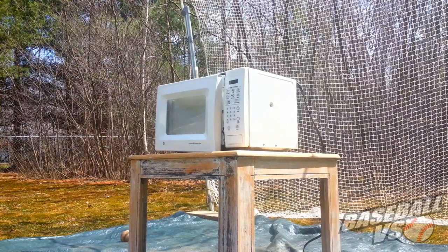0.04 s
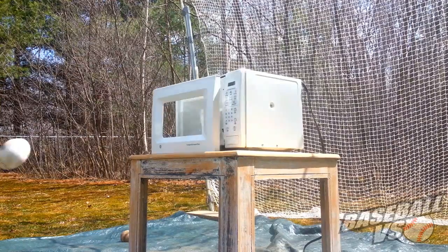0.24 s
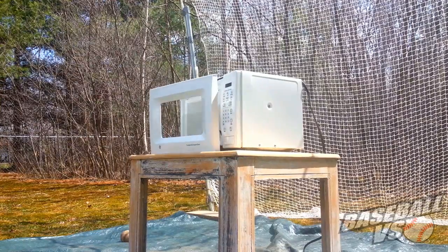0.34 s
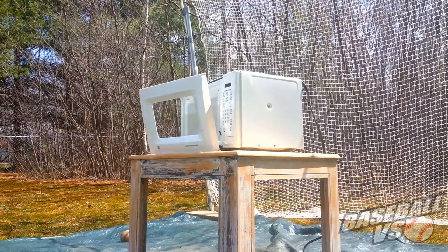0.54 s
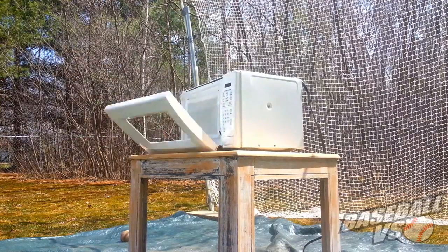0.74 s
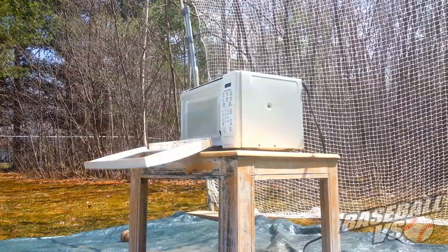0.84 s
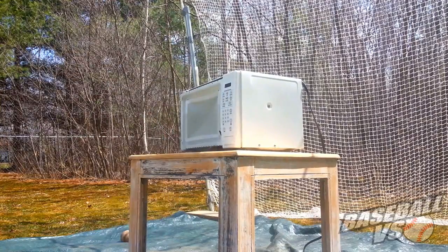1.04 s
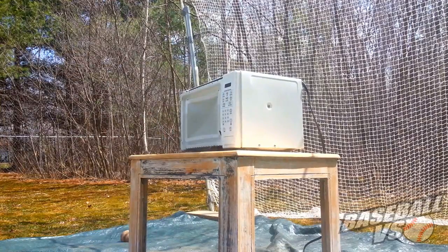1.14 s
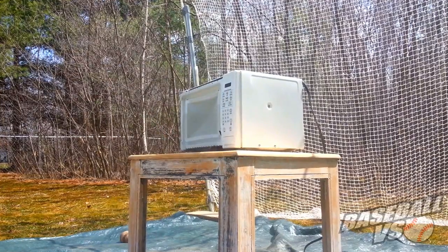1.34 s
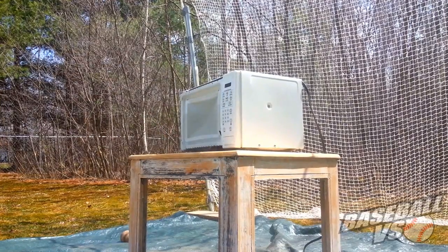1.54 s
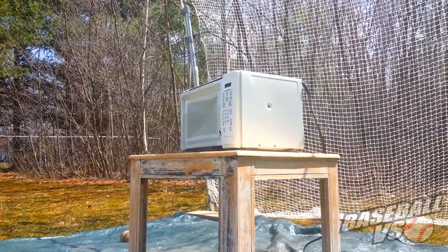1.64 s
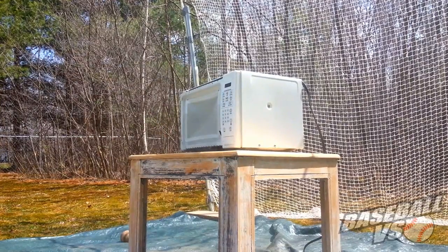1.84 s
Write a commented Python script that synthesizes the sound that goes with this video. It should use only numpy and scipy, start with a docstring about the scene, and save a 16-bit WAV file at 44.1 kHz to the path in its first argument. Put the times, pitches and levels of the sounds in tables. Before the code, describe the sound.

Outdoors, a loud bang rings out as a baseball hits a microwave in front of the microphone, slightly distorting and echoing off trees. About a second later the detached door scrapes, lands with a clatter and bounces.

```python
"""Outdoors among trees, the microphone facing a microwave on a table; soft air and distant chirring.
A fast baseball rushes in and smashes into it, and the bang overloads the microphone. The steel
case rings and the surrounding trees return a long echo. The door tears loose, knocks and scrapes
past the table, then crashes on the ground and bounces with its loose parts rattling."""
import sys
import numpy as np
from scipy import signal
from scipy.fft import rfft, irfft
from scipy.io import wavfile

SR = 44100
rng = np.random.default_rng(int(sys.argv[2]) if len(sys.argv) > 2 else 0)


def to_wav(sig):
    """Store sig (one row per channel, or 1-D mono) as 16-bit WAV at the path in sys.argv[1].

    Samples outside -1..1 are clipped; the rate is SR.
    """
    pcm = np.clip(np.atleast_2d(sig), -1, 1) * 32767
    pcm = np.round(pcm).astype(np.int16)
    wavfile.write(sys.argv[1], SR, pcm.T)  # frames by channels


N = 83790
IMPACT_S = .2437

# blows on the steel case: start_s, crack_db, tilt_db_per_octave, crack_t60_s, ring_db
CASE_BLOWS = [(.2437, 17, -2, 0.017, -13.5), (.2492, 9.5, 0.5, 0.064, -7.5), (.272, 6.5, -3.5, .06, -27.5),
              (.289, -20.5, 2, 0.056, -34), (.371, -9.5, -4, .05, -24.5), (.411, -14.5, -3.5, 0.11, -31)]
# colour of the case's crack and of its ring: frequency_hz, level_db
CASE_CRACK_SPECTRUM = [(40, -21), (90, -8.5), (160, -5), (400, 0), (1000, 1), (2200, -8.5), (5000, -6),
                       (9000, -13.5), (15000, -21)]
CASE_RING_SPECTRUM = [(40, -15), (150, -20), (350, -1), (900, 0.5), (1500, 3.5), (2500, -6), (4500, -14.5),
                      (8000, -12), (15000, -33)]
# ring time of the case: frequency_hz, t60_s
CASE_DECAY = [(60, 0.26), (300, 0.63), (1000, 0.4), (4000, 0.28), (14000, 0.2)]
# sheet steel modes: pitch_hz, level_db, t60_s
STEEL_MODES = [(290.2, -2, 1), (335, -16, .5), (478, -5.5, 0.73), (592, 11, 0.5), (614, -25, .6),
               (796.3, 7.5, 0.62), (873, 5.5, 0.65), (1039, -2, 0.96), (1100, 3, .3), (1155, -2, 0.27),
               (1417, -8, 1), (1540, -27, .45), (1830, -42, .66), (2230, -23, 0.59)]

# blows of the loose door: start_s, crack_db, tilt_db_per_octave, crack_t60_s, ring_db, rim_db
DOOR_BLOWS = [(.639, -43, -2, 0.06, -39.5, -52), (.9227, -16, 12, 0.012, -35.5, -54),
              (0.9634, -21, -1.5, 0.048, -30.5, -29), (1.2004, 3.5, 3, 0.075, -7.5, -2.5),
              (1.218, -8, 3.5, 0.088, -17.5, -26), (1.23, -14, 2.5, .05, -31, -41),
              (1.258, -22, 11, 0.2, -25, -25), (1.2949, -5, -1, 0.048, -13.5, -27),
              (1.3072, -12.5, 0, 0.052, -18, -15), (1.323, -12.5, -1.5, 0.012, -18, -28),
              (1.334, -23, -2, 0.076, -26, -21), (1.345, -14.5, -3, 0.034, -22, -20),
              (1.422, -24, 1, 0.038, -40, -38), (1.4358, -12, 0, 0.019, -23, -14.5),
              (1.469, -26, -4, 0.025, -37, -39), (1.481, -20, -3.5, 0.014, -36, -30),
              (1.6051, -13, -1, 0.048, -32.5, -15.5), (1.6135, -8, 0.5, .018, -25, -7.5),
              (1.641, -23, -1.5, 0.028, -48, -25.5)]
# colour of the door's crack and of its ring: frequency_hz, level_db
DOOR_CRACK_SPECTRUM = [(50, -31), (120, -25.5), (230, -8.5), (450, 0), (780, -0.5), (1300, 0), (1800, 0),
                       (2500, -7.5), (3300, -3), (4000, -6.5), (5200, -5.5), (7200, -17), (15000, -35)]
DOOR_RING_SPECTRUM = [(50, -48), (160, -27), (260, -8), (450, -4.5), (720, 3), (1250, -2.5), (1800, -6),
                      (2500, -11.5), (5000, -18), (9000, -34.5), (15000, -36)]
# ring time of the door: frequency_hz, t60_s
DOOR_DECAY = [(100, 0.29), (400, .26), (1000, 0.17), (4000, 0.25), (14000, 0.27)]
# modes of the plastic frame and window, and of the stiff rim: pitch_hz, level_db, t60_s
DOOR_MODES = [(256.1, -12, 0.78), (435.5, 5, 0.28), (496, 7, 0.22), (566, -17, .25), (670.6, 7, 0.24),
              (667, -7, 0.35), (767, 10, 0.19), (818, 5, 0.24), (1058, -3, .15), (1140, -15, 0.097),
              (1177, 2, 0.21), (1278, -2.5, 0.23), (1456, -1.5, 0.18), (1797, 1, 0.12)]
RIM_MODES = [(296.5, -19, 0.098), (779, -5, 0.038), (1755, -0.5, 0.04), (1865, -7, 0.037),
             (3250, -10.5, 0.022), (4763, -0.5, 0.021), (5047, 0.5, 0.019), (5616, -4.5, 0.015)]

# dull knocks and pushes on door, table and ground: start_s, level_db, pitch_hz, t60_s
THUMPS = [(0.2456, 11, 338, 0.026), (.246, -12, 45.6, 0.11), (0.263, -10, 151, 0.082),
          (.411, -9, 340, 0.078), (.425, -6.5, 240, .05), (0.9234, -33.5, 390, 0.1),
          (.966, -37.5, 242, 0.33), (1.202, -19, 60.3, 0.052), (1.296, -14.5, 71, 0.036),
          (1.694, -28, 110, 0.036), (1.7175, -19, 146, 0.03)]
# colour of a loose part's click and of the door's scrape: frequency_hz, level_db
CLICK_SPECTRUM = [(200, -33), (700, -13), (1200, 14), (2400, -14), (3500, -3), (5500, -3.5), (8000, -10.5),
                  (15000, -38)]
SCRAPE_SPECTRUM = [(100, -20), (600, -3.5), (1500, -10), (2300, -13.5), (4100, -5.5), (6500, -6.5),
                   (9000, -10.5), (14500, -15.5)]
# loudness of the scrape: time_s, level_db
SCRAPE_ENVELOPE = [(1.124, -79), (1.129, -31), (1.146, -25.5), (1.155, -30), (1.162, -35.5), (1.174, -46),
                   (1.186, -38.5), (1.2, -34), (1.21, -66)]
# air rushing round the ball: frequency_hz, level_db
RUSH_SPECTRUM = [(25, -5.5), (70, 4), (200, -12), (500, -11), (1500, -16.5), (5000, -14), (14000, -20)]
# colour of the echo from the trees: frequency_hz, level_db
ECHO_SPECTRUM = [(40, -58), (85, -30.5), (130, -1), (230, 0), (450, -0.5), (900, -7.5), (1600, -12),
                 (2600, -15), (4200, -14), (7000, -22), (14000, -36)]
# decay of that echo: frequency_hz, t60_s
ECHO_DECAY = [(60, 1.27), (170, 1.32), (350, 1.03), (900, 0.82), (2500, 1.1), (4500, 0.78), (8000, 0.64),
              (14000, 0.33)]
# open air: frequency_hz, level_db
AIR_SPECTRUM = [(20, -37), (60, -1), (110, -1.5), (200, -1.5), (300, -5.5), (700, -10.5), (1500, -13),
                (2800, -19), (5000, -21), (9000, -24.5), (14500, -23.5)]


def steel_case():
    """The ball hits, the door bursts and the box jumps on the table: each blow cracks and rings."""
    out = np.zeros(N)
    for start_s, crack_db, tilt_db, t60_s, ring_db in CASE_BLOWS:
        ring = dense_ring(CASE_RING_SPECTRUM, CASE_DECAY, size=32768, rise_s=0.0021)
        ring += amp(-4) * struck_modes(STEEL_MODES, size=32768)
        add(out, start_s, amp(crack_db) * crack(CASE_CRACK_SPECTRUM, tilt_db, t60_s, size=8192))
        add(out, start_s, amp(ring_db) * ring)
    return out


def loose_door():
    """The door knocks on the table, lands and bounces: a crack, a clack of its rim, a hollow ring."""
    out = np.zeros(N)
    for start_s, crack_db, tilt_db, t60_s, ring_db, rim_db in DOOR_BLOWS:
        ring = dense_ring(DOOR_RING_SPECTRUM, DOOR_DECAY, size=16384, rise_s=0.0045)
        ring += amp(-0.5) * struck_modes(DOOR_MODES, size=16384)
        add(out, start_s, amp(crack_db) * crack(DOOR_CRACK_SPECTRUM, tilt_db, t60_s, size=8192))
        add(out, start_s, amp(rim_db) * struck_modes(RIM_MODES, size=8192))
        add(out, start_s, amp(ring_db) * ring)
    return out


def thumps():
    """Door, table and ground answer knocks and pushes with heavily damped low swings."""
    out = np.zeros(N)
    t = np.arange(SR // 2) / SR
    for start_s, level_db, pitch_hz, t60_s in THUMPS:
        swing = -np.sin(2 * np.pi * pitch_hz * t) * fade(t, t60_s)
        attack = np.minimum(2 * t * pitch_hz, 1)  # half a cycle
        add(out, start_s, amp(level_db) * swing * attack)
    return out


def rattle():
    """After the landing, loose parts chatter in a dying shower of small clicks."""
    start_s, end_s = 1.235, 1.49
    parts, clicks_per_s = 8, 650  # the rate of all parts together
    size = round((end_s - start_s) * SR)
    out, clicks = np.zeros(N), np.zeros(size)
    for _ in range(parts):
        hits = rng.random(N)[:size] < clicks_per_s / parts / SR
        hit_db = -0.5 * np.minimum(rng.exponential(1, N), 4)[:size]
        click = crack(CLICK_SPECTRUM, tilt_db=0, t60_s=0.0062, size=1024)
        clicks += signal.fftconvolve(hits * amp(hit_db), click)[:size]
    add(out, start_s, amp(-15.5) * unit_rms(clicks) * fade(np.arange(size) / SR, t60_s=0.53))
    return out


def scrape():
    """The door slides past an edge just before landing: brief, bright friction noise."""
    t = np.arange(N) / SR
    level_db = np.interp(t, *np.transpose(SCRAPE_ENVELOPE), left=-120, right=-120)
    return noise(SCRAPE_SPECTRUM, N) * amp(level_db)


def ball_rush():
    """Air rushes louder as the ball closes in, and stops at the impact."""
    arrival_db, rise_db_per_s = -44.5, 114
    t = np.arange(N) / SR
    level_db = arrival_db - rise_db_per_s * abs(IMPACT_S - t)
    return noise(RUSH_SPECTRUM, N) * amp(level_db) * (t < IMPACT_S)


def tree_echo():
    """The bang comes back from many trunks as a wash of noise, the bass lingering longest."""
    round_trip_s = .035
    out = np.zeros(N)
    echo = dense_ring(ECHO_SPECTRUM, ECHO_DECAY, size=65536, rise_s=0.053)
    add(out, IMPACT_S + round_trip_s, amp(-11.5) * echo)
    return out


def outdoor_air():
    """Soft open air, with a thin, high band of chirring in the distance."""
    chirr_hz, width_hz = 3580, 440
    hz = np.fft.rfftfreq(N, 1 / SR)
    band = np.exp(-.5 * ((hz - chirr_hz) / width_hz) ** 2)
    chirr = irfft(rfft(rng.standard_normal(N)) * band, N)
    return amp(-51) * noise(AIR_SPECTRUM, N) + amp(-58.5) * unit_rms(chirr)


def crack(spectrum, tilt_db, t60_s, size):
    """A short burst of contact noise, coloured by the struck object."""
    burst = rng.standard_normal(size) * fade(np.arange(size) / SR, t60_s)
    return colour(burst, spectrum, tilt_db)


def struck_modes(modes, size):
    """An object's main modes: decaying sines, struck in a new mixture each time."""
    t = np.arange(size) / SR
    hz, level_db, t60_s = np.transpose(modes)[:, :, None]
    phase, boost = rng.random((len(hz), 2)).T[:, :, None]
    weight = amp(level_db) / np.linalg.norm(amp(level_db)) * (1 + boost)
    attack = np.minimum(t * hz / 2, 1)  # two cycles
    return (weight * np.sin(2 * np.pi * (hz * t + phase)) * fade(t, t60_s) * attack).sum(0)


def dense_ring(spectrum, decay, size, rise_s):
    """Countless close modes: noise that swells, then dies at its own speed in each band."""
    t, hz = np.arange(size) / SR, np.fft.rfftfreq(size, 1 / SR)
    centres_hz = np.geomspace(60, 14000, 10)
    noise_bins = rfft(noise(spectrum, size))
    ring = np.zeros(size)
    for centre_hz, selector in zip(centres_hz, np.eye(len(centres_hz))):
        band = value_at(np.c_[centres_hz, selector], hz)  # slopes to zero at the neighbouring centres
        ring += irfft(noise_bins * band, size) * fade(t, value_at(decay, centre_hz))
    return np.minimum(t / rise_s, 1) * ring


def colour(x, spectrum, tilt_db):
    """Minimum-phase filter of unit energy: a spectrum, tilted by tilt_db per octave above 300 Hz."""
    size = 2048
    hz = abs(np.fft.fftfreq(size, 1 / SR))
    log_gain = np.log(amp(value_at(spectrum, hz) + tilt_db * np.log2(np.maximum(hz, 300))))
    response = np.exp(np.conj(signal.hilbert(log_gain)))
    taps = np.fft.ifft(response).real[:size // 2]
    return signal.fftconvolve(x, taps / np.linalg.norm(taps))[:len(x)]


def noise(spectrum, size):
    """Random-phase noise of a given colour, at rms 1."""
    hz = np.fft.rfftfreq(size, 1 / SR)
    phasors = np.exp(2j * np.pi * rng.random(len(hz)))
    return unit_rms(irfft(amp(value_at(spectrum, hz)) * phasors, size))


def fade(t, t60_s):
    """Exponential decay, 60 dB down after t60_s."""
    return np.exp(-np.log(1000) * t / np.maximum(t60_s, 1e-3))


def value_at(table, hz):
    """Reads a table along a log-frequency axis."""
    table_hz, values = np.transpose(table)
    return np.interp(np.log(hz + 1), np.log(table_hz + 1), values)


def amp(db):
    """Decibels to gain."""
    return 10 ** (np.asarray(db) / 20)


def unit_rms(x):
    """Scales to rms 1."""
    return x / np.sqrt(np.mean(x ** 2) + 1e-20)


def add(mix, start_s, sound):
    """Mixes a sound in at start_s."""
    part = mix[round(start_s * SR):][:len(sound)]
    part += sound[:len(part)]


def scene():
    """Everything lies straight ahead of the microphone; a trace of scatter sets the channels apart."""
    mid = ball_rush() + steel_case() + tree_echo()
    mid = mid + loose_door() + scrape() + rattle() + thumps() + outdoor_air()
    scatter = rng.standard_normal(size=128)
    side = amp(-50) * signal.fftconvolve(mid, scatter / np.linalg.norm(scatter))[:N]
    return np.array([mid + side, mid - side])


def record(dry):
    """The microphone overloads on the big hits, rounding their peaks; a low-pass trims the top."""
    ceiling, knee, cutoff_hz = 0.68, 4, 15000
    clipped = dry / (1 + abs(dry / ceiling) ** knee) ** (1 / knee)
    low_pass = signal.firwin(161, cutoff_hz, window=("kaiser", 8), fs=SR)
    return signal.oaconvolve(clipped, low_pass[None], "same")


dry = scene()
out = record(dry)
to_wav(out)
```